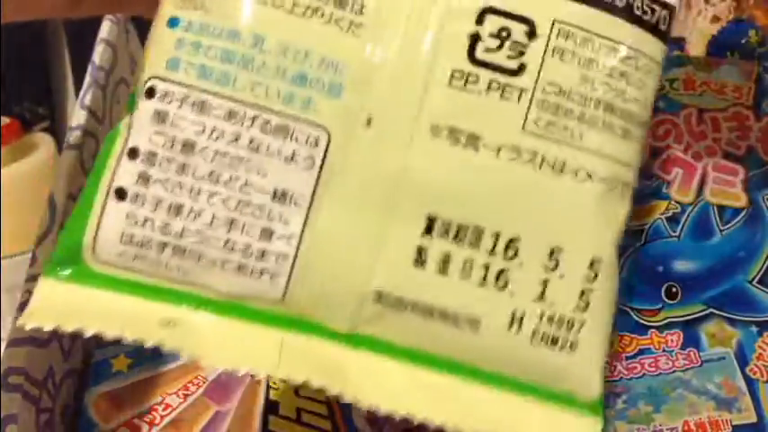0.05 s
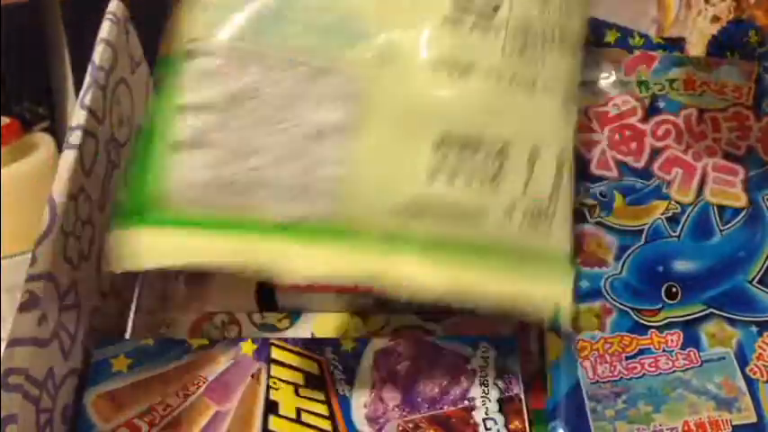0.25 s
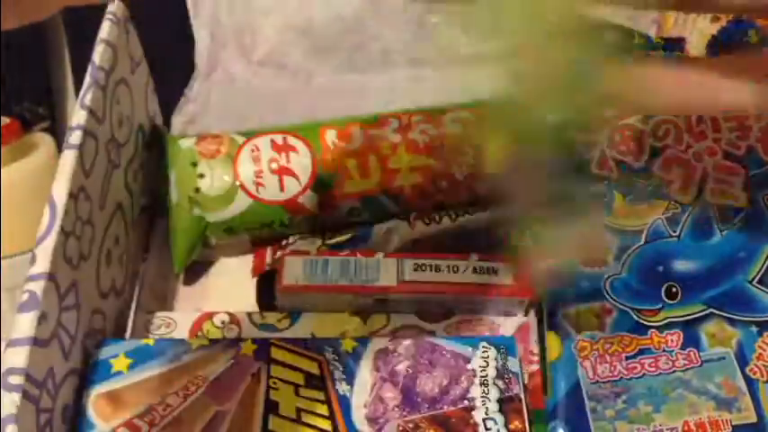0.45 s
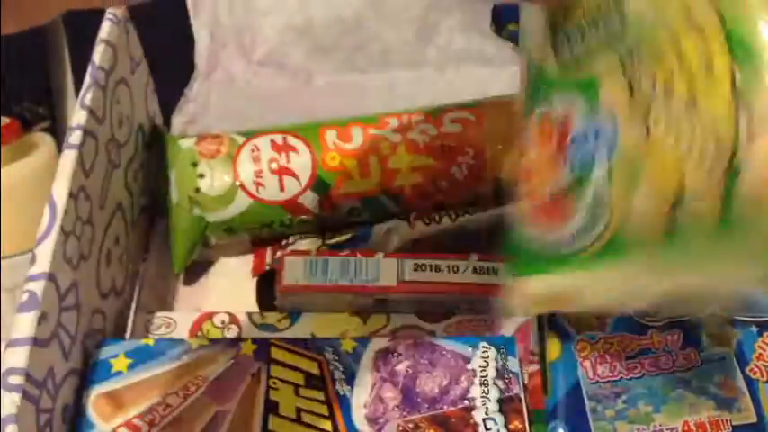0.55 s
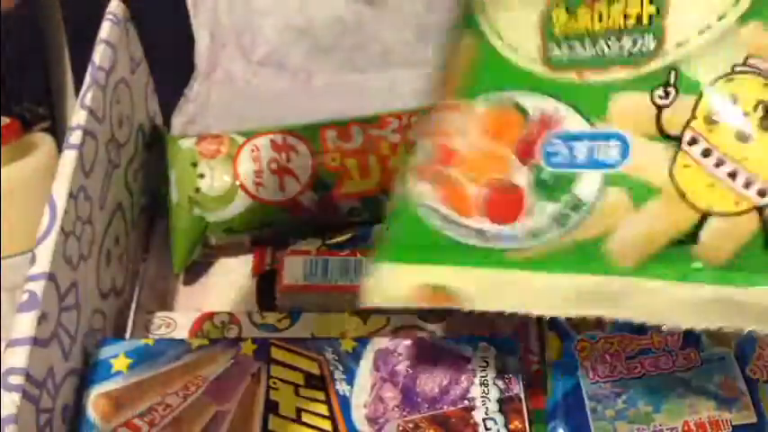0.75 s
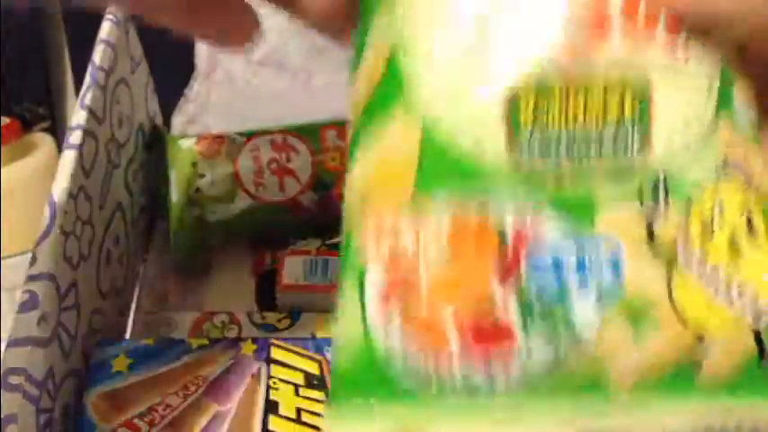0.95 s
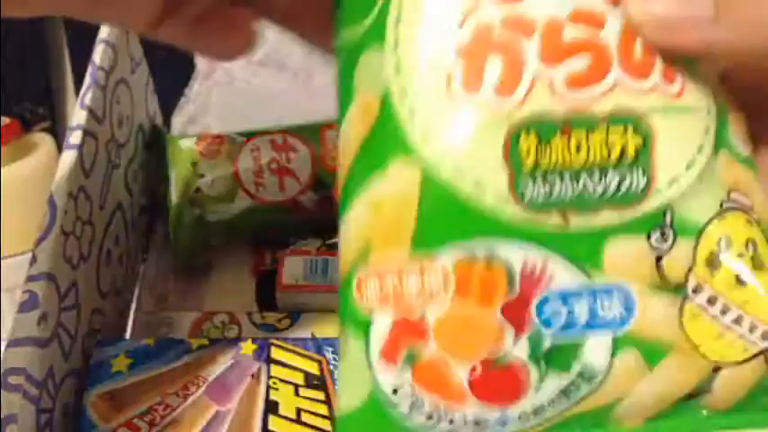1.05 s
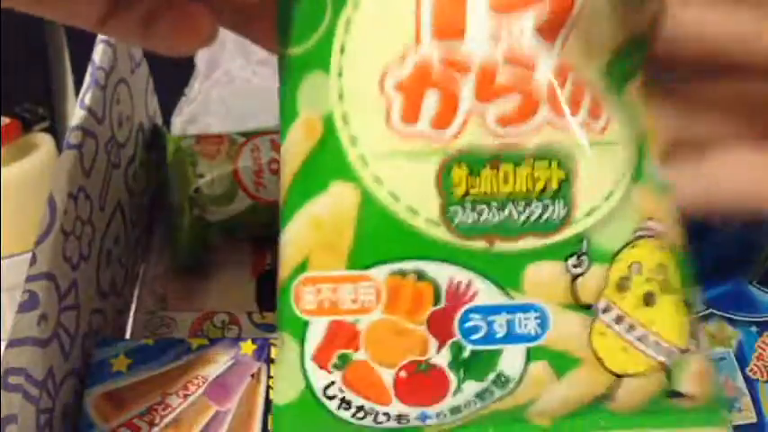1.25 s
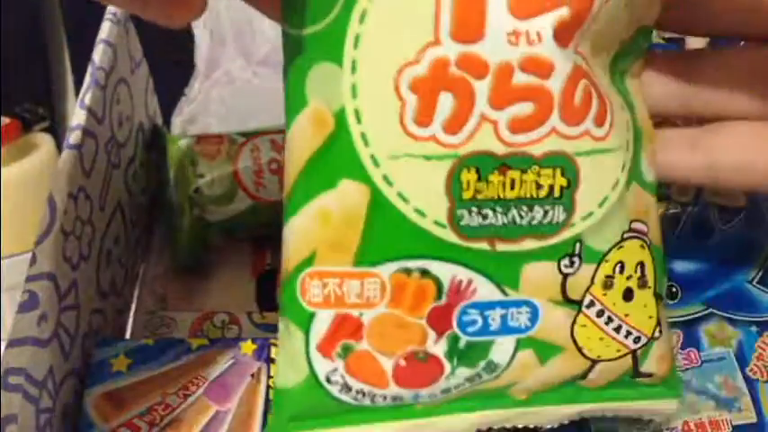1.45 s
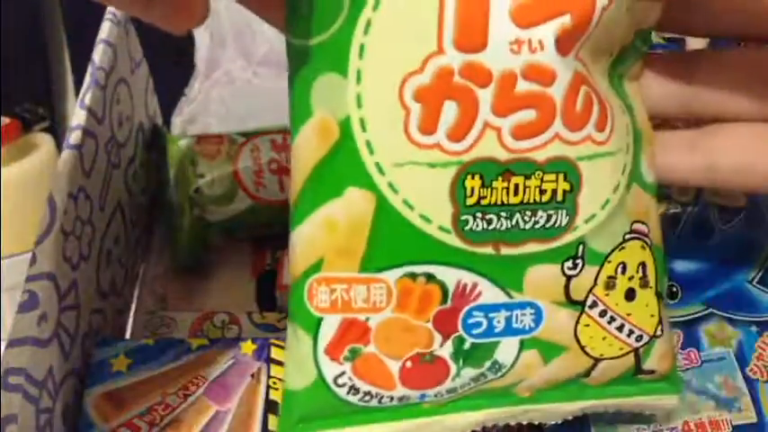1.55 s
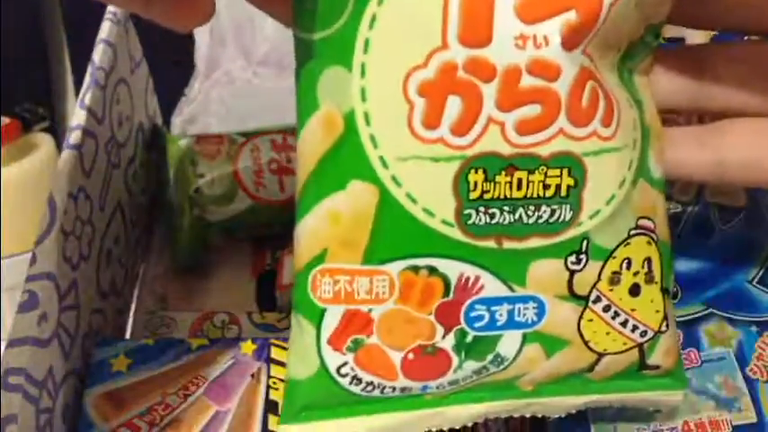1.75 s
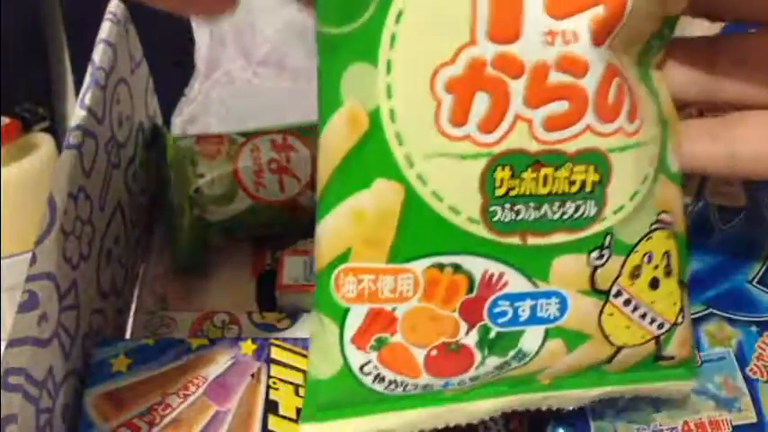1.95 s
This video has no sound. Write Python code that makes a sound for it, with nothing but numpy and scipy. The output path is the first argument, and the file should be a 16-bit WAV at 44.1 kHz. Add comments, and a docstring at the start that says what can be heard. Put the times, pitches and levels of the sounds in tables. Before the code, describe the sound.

A plastic snack bag crackles close to the microphone, with sharp snaps bunching in the first second, a brief bright finger rub afterward, then scattered ticks fading toward quiet in a small room with faint hum.

```python
"""In a small room, a plastic snack bag is turned over by hand, close by.
Creases in the stiff film snap through one by one: short jolts and noise that make parts of the bag ring.
Between them the film rustles and fingers slide over it, both made of tiny clicks and rubbing noise.
The snacks knock inside as fading low tones. The handling has a short echo.
A faint appliance hum, made of two close tones, beats in the background."""
import sys
import numpy as np
from scipy import signal
from scipy.fft import rfft, irfft
from scipy.io import wavfile

SR = 44100
rng = np.random.default_rng(int(sys.argv[2]) if len(sys.argv) > 2 else 0)


def dump(signal):
    """Clip the signal to [-1, 1] and save it as 16-bit WAV at the path in sys.argv[1]."""
    limited = np.clip(np.atleast_2d(signal).T, -1, 1)
    pcm = np.round(limited * 32767).astype(np.int16)
    wavfile.write(sys.argv[1], SR, pcm)


N = 88200  # samples: two seconds
TIME = np.arange(N) / SR


def from_db(db):
    """Turn decibels into a gain."""
    return 10 ** (np.asarray(db) / 20)


def rms_one(x):
    """Scale a sound to an rms (average strength) of 1."""
    return x / np.sqrt(np.mean(x ** 2) + 1e-20)


def level(rows):
    """Draw a gain over time through points of time and decibels."""
    s, db = np.transpose(rows)
    return from_db(np.interp(TIME, s, db))


def band(x, hz, kind="band", order=2):
    """Keep part of the pitch range with a Butterworth filter, which only looks back in time."""
    safe_hz = np.clip(hz, 10, .45 * SR)
    return signal.sosfilt(signal.butter(order, safe_hz, kind, fs=SR, output="sos"), x)


def colour(x, points):
    """Multiply the spectrum by a curve through points of pitch and decibels."""
    hz, db = np.transpose(points)
    bins = np.maximum(np.fft.rfftfreq(len(x), 1 / SR), 1)
    gain = from_db(np.interp(np.log(bins), np.log(hz), db))
    return irfft(rfft(x) * gain, len(x))


def resonate(x, hz, width_hz):
    """Ring at one pitch; a wider resonance dies away sooner."""
    r = np.exp(-np.pi * width_hz / SR)
    return signal.lfilter([1, 0, -1], [1, -2 * r * np.cos(2 * np.pi * hz / SR), r * r], x)


def add(out, s, sound):
    """Mix a sound in at time s, in seconds."""
    i = int(np.clip(s * SR, 0, N - 1))
    out[i:i + len(sound)] += sound[:N - i]


# Strength of the appliance hum over time: t/s, level/dB (rms)
HUM_LEVEL = [(0, -67.5), (.2, -68), (.5, -68), (.85, -75.5), (1.15, -72), (1.5, -72.5), (1.85, -75.5),
             (2, -73)]
# Tone balance of the room's quiet air: f/Hz, level/dB (relative)
AIR_COLOUR = [(30, -5.5), (85, -20.5), (140, 15), (280, 13), (450, -8.5), (1000, -17), (3000, -20.5),
              (15000, -42)]
AIR_DB = -73  # rms
HUM_HZ, BEAT_HZ = 118.5, 3.04  # middle of the two tones, and the distance between them
BEAT_DEPTH = .75  # strength of the higher tone against the lower
DRONE_HZ, DRONE_WIDTH_HZ, DRONE_DB = 270, 4.3, -72


def background():
    """Two close hum tones beat as they drift in and out of step, over a faint drone and quiet air."""
    low = np.sin(2 * np.pi * (HUM_HZ - BEAT_HZ / 2) * TIME)
    high = np.sin(2 * np.pi * (HUM_HZ + BEAT_HZ / 2) * TIME)
    hum = level(HUM_LEVEL) * rms_one(low - BEAT_DEPTH * high)
    drone = from_db(DRONE_DB) * rms_one(resonate(rng.standard_normal(N), DRONE_HZ, DRONE_WIDTH_HZ))
    air = from_db(AIR_DB) * rms_one(colour(rng.standard_normal(N), AIR_COLOUR))
    return hum + drone + air


GRAIN_HZ, GRAIN_WIDTH = (910, 12330), 0.72  # pitch range of the tiny creases; width as a share of pitch
GRIP_WAVER_HZ = 86  # fastest rate at which the uneven grip wavers


def friction(per_s, spread_db, share, waver_db, count=14):
    """Tiny creases of uneven size ring at several pitches on rubbing noise; both waver with the grip."""
    sizes = from_db(spread_db * np.minimum(rng.exponential(1, N), 4)) * rng.choice([-1, 1], N)
    clicks = sizes * (rng.random(N) < per_s / SR)
    dealt = rng.integers(0, count, N)  # which pitch each click rings at
    grains = np.zeros(N)
    for k, hz in enumerate(np.geomspace(*GRAIN_HZ, count)):
        own_clicks = clicks * (dealt == k) + 1e-18
        grains += hz * resonate(own_clicks, hz, GRAIN_WIDTH * hz)
    share = np.clip(share, 0, 1)  # the creases' part of the power
    waver = rms_one(band(rng.standard_normal(N), (GRIP_WAVER_HZ / 2, GRIP_WAVER_HZ)))
    rubbing = rng.standard_normal(N)
    return from_db(waver_db * waver) * (np.sqrt(share) * rms_one(grains) + np.sqrt(1 - share) * rubbing)


# Strength of the handled film's rustle over time: t/s, level/dB (rms)
RUSTLE_LEVEL = [(0, -42.5), (.04, -49.5), (.09, -60.5), (.21, -66.5), (.36, -61.5), (.395, -52.5),
                (.44, -39), (.51, -45.5), (.58, -44), (.64, -44), (.70, -56), (.76, -46.5), (.81, -55),
                (.86, -48.5), (.90, -57.5), (.95, -54), (1.06, -60), (1.10, -50), (1.17, -45),
                (1.31, -49.5), (1.35, -55), (1.39, -49.5), (1.41, -65), (1.455, -57.5), (1.485, -44),
                (1.52, -67), (1.55, -44), (1.605, -47), (1.62, -67.5), (1.65, -44.5), (1.685, -67.5),
                (1.735, -57), (1.76, -69.5), (1.88, -74.5), (1.94, -62.5), (1.98, -53.5), (2.0, -54)]
# Tone balance of the rustle: f/Hz, level/dB (relative)
RUSTLE_TONE = [(100, -36), (200, 4), (350, 2), (560, 0), (800, 6.5), (1600, 6), (3000, 2.5), (6000, -0.5),
               (10000, -2), (15000, -4.5)]
CRINKLES_PER_S, CRINKLE_SPREAD_DB, CRINKLE_SHARE, RUSTLE_WAVER_DB = 2100, 3.5, 0.26, 2.5


def rustle():
    """Countless small creases give way as the hands move."""
    film = friction(CRINKLES_PER_S, CRINKLE_SPREAD_DB, CRINKLE_SHARE, RUSTLE_WAVER_DB)
    return level(RUSTLE_LEVEL) * rms_one(colour(film, RUSTLE_TONE))


# Tone balance of the room's echo: f/Hz, level/dB (against the sound sent into the room)
ECHO_COLOUR = [(100, -37), (300, -2), (1000, -13.5), (3000, -11.5), (7000, -11), (15000, -16.5)]
ROOM_T60_S, ROOM_DELAY_S, ROOM_BUILD_S = 0.15, 0.00048, 0.0019  # T60: time to fade by 60 dB


def room(x, size=22050):
    """The room smears the sound into a short echo that builds up just after it, then fades."""
    t = np.maximum(np.arange(size) / SR - ROOM_DELAY_S, 0)
    shape = (1 - np.exp(-t / ROOM_BUILD_S)) * np.exp(-np.log(1000) * t / ROOM_T60_S)
    echo = colour(rng.standard_normal(size), ECHO_COLOUR) * shape / np.linalg.norm(shape)
    return signal.fftconvolve(x, echo)[:N]


SNAP_SPAN_S = .005  # the levels of snaps and facets are rms over this time
REBOUND = 0.37  # second jolt, after the settling time, as a share of the first
FLUTTER_SHARE = 2.4  # strength of the film's flutter against the first jolt, per ms of settling
PANEL_FLUTTER = 0.26  # the larger, slower parts of the film follow only this share of the flutter
CREAK_SHARE, CREAK_RISE_S, CREAK_LEAD_S = .3, .0006, .005  # noise that swells just before the jolt
THUMP_HZ, FACE_HZ, CRACK_HZ = (220, 456), (719, 1130), (3030, 9030)
PANEL_WIDTH, PANEL_HZ = 0.27, (1030, 3230)  # width as a share of pitch; range that the panels radiate
SIZZLE_HZ = (6920, 11470)  # for a crease that settles slowly
QUICK_MS, QUICK_RISE = 1, 0.81  # faster settling than this sizzles higher, by this power of its speed
# Creases that snap: t/s, settling time/ms, panel f/Hz, then five levels, each level/dB (rms):
# whole face, panel, crack, sizzle, thump of the air inside
CREASE_SNAPS = [(0.0055, 0.58, 2860, -73, -67, -41, -43, -51),
                (0.1611, 2.4, 1580, -76, -55, -55.5, -61.5, -59.5),
                (0.2282, 1.02, 2010, -30.5, -24, -21, -28, -55.5),
                (0.3202, 0.86, 1770, -70, -56, -54, -62, -74),
                (0.3665, 1.1, 1530, -63.5, -56, -65, -60, -77),
                (0.3921, 0.89, 3210, -72, -62, -34.5, -61, -67),
                (0.4016, 1.9, 1770, -36.5, -25.5, -38, -34.5, -40.5),
                (0.4152, 1.68, 1800, -30.5, -19.5, -24, -24.5, -47.5),
                (0.4291, 2.46, 2200, -52, -32.5, -30.5, -33, -60),
                (0.4536, 2.6, 2040, -44, -38, -55, -53, -72), (0.4635, 0.99, 2165, -64, -58, -56, -39, -68),
                (0.5515, 1.23, 2020, -34.5, -32.5, -46, -54, -49),
                (0.602, 2.3, 2130, -48, -35.5, -34, -45.5, -74),
                (0.6053, 1.37, 1980, -60, -28, -34, -44, -42),
                (0.6098, 1.72, 1790, -42.5, -38, -43, -44, -42),
                (0.6673, 1.74, 2200, -41.5, -25, -25, -29, -43),
                (0.6763, 3.8, 1740, -42, -45, -35, -39.5, -65),
                (0.6816, 1.5, 1870, -47, -32, -38, -32.5, -65),
                (0.686, 3, 1840, -37, -28.5, -45, -31.5, -39), (0.693, 11, 1750, -36, -32.5, -28, -40, -61),
                (0.699, 0.6, 1695, -39.5, -23, -22.5, -19.5, -58),
                (0.745, 4.6, 2080, -62, -43.5, -37.5, -47, -72),
                (0.7525, 1.6, 2200, -55, -49, -39, -52, -72),
                (0.778, 1.28, 1720, -51, -44.5, -57, -64.5, -80),
                (0.844, 0.69, 1510, -54, -49, -59, -57, -85), (0.857, 4.1, 2230, -65, -62, -49, -58, -84),
                (0.9274, 3.5, 1580, -51.5, -44, -40.5, -59, -54),
                (0.9686, 1.2, 1725, -44, -24.5, -30.5, -38, -47.5),
                (1.084, 4.5, 1660, -46.5, -46.5, -56, -75, -72),
                (1.094, 1.5, 1290, -43.5, -35.5, -39, -56, -65),
                (1.122, 2.24, 1960, -44, -44.5, -33.5, -35.5, -53),
                (1.1645, 0.83, 1900, -35.5, -28, -24, -21.5, -44),
                (1.309, 2, 1980, -48, -57, -36, -33, -56), (1.375, 2.2, 1550, -66, -54, -63, -49, -69),
                (1.419, 1.44, 1740, -59, -52, -55, -67, -81.5),
                (1.431, 0.99, 2290, -60, -53, -51.5, -64.5, -75),
                (1.4418, 0.82, 2470, -52.5, -50, -44, -45.5, -59),
                (1.461, 1.2, 1890, -55.5, -43.5, -52.5, -57.5, -60),
                (1.5328, 0.75, 2280, -59.5, -64, -48, -45.5, -75),
                (1.539, 1.9, 1930, -57.5, -55.5, -47, -41, -61.5),
                (1.5458, 1.08, 2100, -49.5, -34.5, -36, -38, -40.5),
                (1.5478, 1.35, 1415, -38, -31, -24.5, -32.5, -52.5),
                (1.566, 2.0, 2400, -59.5, -44.5, -46.5, -33, -62),
                (1.5695, 0.69, 2650, -42, -25.5, -21, -25, -38.5),
                (1.5912, 0.64, 2170, -40, -34.5, -28.5, -30.5, -65.5),
                (1.6208, 0.65, 1650, -43.5, -34.5, -30, -32.5, -62.5),
                (1.636, 0.85, 1550, -67.5, -57, -40.5, -59, -80.5),
                (1.6483, 1.18, 1920, -53, -50.5, -48.5, -58.5, -52),
                (1.6941, 0.43, 2510, -59.5, -61, -55.5, -69, -76.5),
                (1.7342, 2, 1840, -71.5, -73, -54, -63, -77),
                (1.7482, 0.6, 2590, -70, -60.5, -53, -55.5, -90),
                (1.781, 1.3, 2870, -77, -58.5, -55, -68, -85),
                (1.817, 1.5, 2920, -88, -59.5, -63, -72, -92),
                (1.9636, 0.91, 2740, -60, -53.5, -52.5, -71.5, -89),
                (1.9869, 1.24, 1420, -42.5, -37.5, -39.5, -74, -49),
                (1.9945, 1.86, 1640, -51, -40.5, -42, -66, -62)]


def snaps(size=1024):
    """A crease creaks, jolts, rebounds and flutters, which shakes the air inside, the face and a panel.

    Returns the sound towards the listener and the smoother one that the bag sends all round the room."""
    direct, all_round = np.zeros(N), np.zeros(N)
    lead = int(CREAK_LEAD_S * SR)
    t = (np.arange(size) - lead) / SR
    click = 1. * (t == 0)
    for row, noise in zip(CREASE_SNAPS, rng.standard_normal((len(CREASE_SNAPS), size))):
        s, settle_ms, hz, face_db, panel_db, crack_db, sizzle_db, thump_db = row
        settle = settle_ms / 1000
        jolts = click + REBOUND * np.sinc((t - settle) * SR)
        creak_shape = CREAK_SHARE * np.exp(-abs(t) / CREAK_RISE_S)
        flutter = noise * np.where(t < 0, creak_shape, np.exp(-abs(t) / settle))
        flutter = FLUTTER_SHARE * settle_ms * flutter / np.linalg.norm(flutter)
        sharp = jolts + flutter
        push = jolts + PANEL_FLUTTER * flutter
        panel = resonate(push, hz, PANEL_WIDTH * hz)
        sizzle_hz = np.multiply(SIZZLE_HZ, max(QUICK_MS / settle_ms, 1) ** QUICK_RISE)
        parts = [(band(click, THUMP_HZ), THUMP_HZ, thump_db),
                 (band(push, FACE_HZ, order=3), FACE_HZ, face_db),
                 (band(panel, PANEL_HZ), PANEL_HZ, panel_db),
                 (band(sharp, CRACK_HZ, order=3), CRACK_HZ, crack_db),
                 (band(sharp, sizzle_hz), sizzle_hz, sizzle_db)]
        snap = sum(from_db(db) * part / np.linalg.norm(part) for part, _, db in parts)
        snap = np.sqrt(SNAP_SPAN_S * SR) * snap
        # One point at the middle of each band, its power spread over the band's width
        points = [(np.sqrt(low * high), db - 10 * np.log10(high - low)) for _, (low, high), db in parts]
        smooth = colour(click, points)
        smooth = smooth * np.linalg.norm(snap) / np.linalg.norm(smooth)  # same energy as the snap
        add(direct, s - lead / SR, snap)
        add(all_round, s - lead / SR, smooth)
    return direct, all_round


FACET_WIDTH, FACET_LOW_HZ = .11, 700  # width as a share of pitch; facets are too small to radiate bass
# Stiff facets of the film that the hardest snaps leave ringing: t/s, f/Hz, level/dB (rms)
RINGING_FACETS = [(0.2278, 930, -35), (0.2281, 5100, -30), (0.4157, 3350, -31), (0.4157, 3980, -26.5),
                  (0.6682, 2640, -42), (0.6993, 14700, -33), (0.9676, 2570, -32.5), (0.9687, 3620, -34),
                  (1.1659, 1310, -42), (1.1646, 2520, -40.5), (1.1647, 4240, -47), (1.5709, 3450, -26.5),
                  (1.5695, 4750, -26.5)]


def facets(size=1024):
    """Small stiff patches of film ring briefly and give each hard snap a colour of its own."""
    out = np.zeros(N)
    click = 1. * (np.arange(size) == 0)
    for s, hz, db in RINGING_FACETS:
        ring = band(resonate(click, hz, FACET_WIDTH * hz), FACET_LOW_HZ, "high")
        add(out, s, from_db(db) * np.sqrt(SNAP_SPAN_S * SR) * ring / np.linalg.norm(ring))
    return out


KNOCK_T60_S = 0.041  # time to fade by 60 dB
# Soft knocks of the snacks inside: t/s, level/dB (at the start, before the bass is cut), f/Hz
SNACK_KNOCKS = [(0.254, -43, 270), (0.426, -38, 366), (0.453, -39, 318), (0.478, -36.5, 436),
                (0.491, -35.5, 383), (.604, -31.5, 270), (0.613, -39.5, 220), (0.677, -40, 271),
                (0.687, -32.5, 245), (0.908, -51.5, 300), (0.973, -41, 304), (1.083, -40, 404),
                (1.126, -46, 335), (1.171, -54, 396), (1.268, -47, 337), (1.363, -46, 252),
                (1.501, -48, 267), (1.546, -51, 319), (1.605, -39, 405), (1.649, -50.5, 295),
                (1.988, -40, 244)]


def knocks(size=4096):
    """The contents bump against the air-filled bag: dull tones that die away quickly."""
    out = np.zeros(N)
    t = np.arange(size) / SR
    for s, db, hz in SNACK_KNOCKS:
        add(out, s, from_db(db - 60 * t / KNOCK_T60_S) * np.sin(2 * np.pi * hz * t))
    return band(out, 180, "high")


# Strength of the fingers' slide over time: t/s, level/dB (before scaling by the unit-rms friction)
SLIDE_LEVEL = [(1.10, -61), (1.154, -49), (1.166, -33), (1.185, -34), (1.218, -31.5), (1.236, -39),
               (1.254, -39), (1.264, -43), (1.274, -38), (1.288, -35.5), (1.308, -33.5), (1.32, -50),
               (1.34, -79.5)]
# Tone balance of the slide: f/Hz, level/dB (relative)
SLIDE_TONE = [(200, -31), (600, -7), (1500, -2), (3000, -2), (6000, 2), (9500, 0.5), (12000, -3.5),
              (15000, -1.5)]
SLIPS_PER_S, SLIP_SPREAD_DB, SLIP_SHARE, SLIP_WAVER_DB = 3300, 2.5, .62, 1.3


def slide():
    """Skin sticks and slips on the film in one bright stroke."""
    touching = (TIME > SLIDE_LEVEL[0][0]) & (TIME < SLIDE_LEVEL[-1][0])
    skin = friction(SLIPS_PER_S, SLIP_SPREAD_DB, SLIP_SHARE, SLIP_WAVER_DB)
    return touching * level(SLIDE_LEVEL) * rms_one(colour(skin, SLIDE_TONE))


def scene():
    """Mix the bag, its echo and the background."""
    quiet = background()
    handling = rustle() + knocks() + slide()
    direct, all_round = snaps()
    echo = room(all_round + handling)
    return (direct + facets() + handling + echo + quiet)[None]


def record(dry):
    """Cut the top of the treble steeply, above about 15600 Hz."""
    lowpass = signal.firwin(161, 15600, fs=SR, window="blackman")
    return signal.fftconvolve(dry, lowpass[None], "same")


dry = scene()
out = record(dry)
dump(out)
```